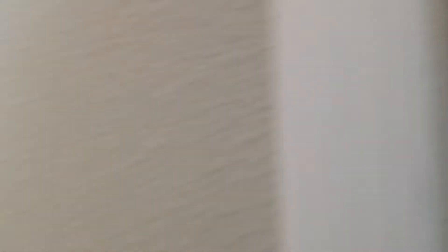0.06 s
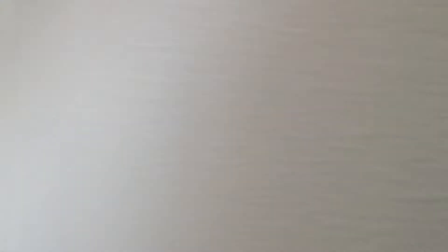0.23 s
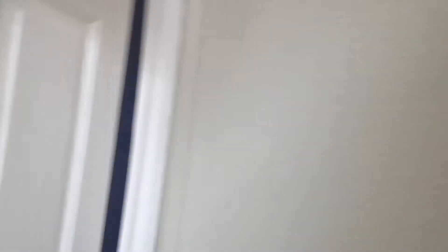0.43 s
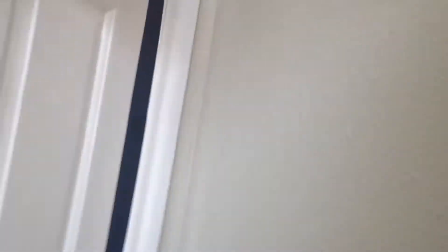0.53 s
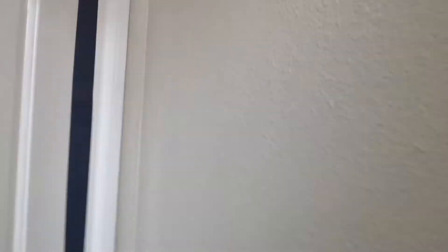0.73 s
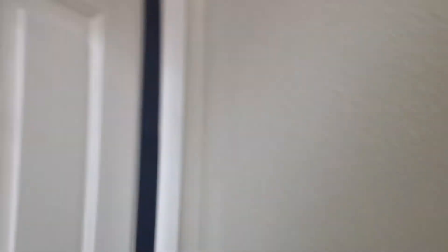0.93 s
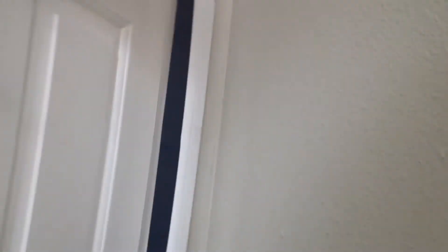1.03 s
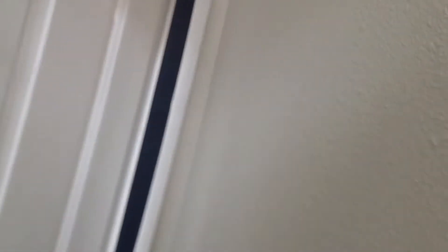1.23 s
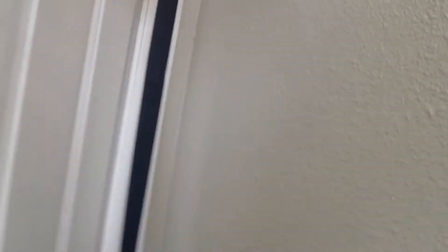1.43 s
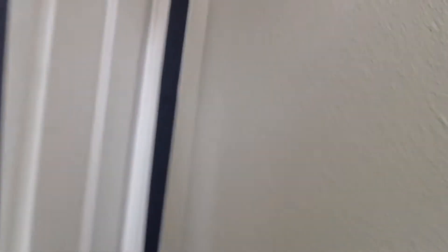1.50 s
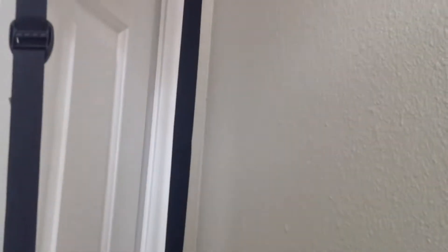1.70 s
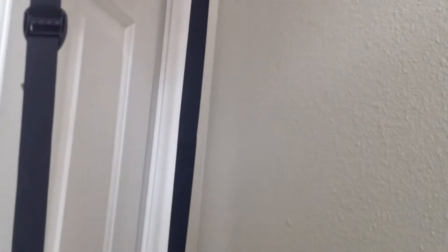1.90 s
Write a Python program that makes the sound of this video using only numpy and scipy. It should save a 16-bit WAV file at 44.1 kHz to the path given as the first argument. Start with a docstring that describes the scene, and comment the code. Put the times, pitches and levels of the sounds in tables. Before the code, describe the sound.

One sharp, metallic snap of a latch or switch rings briefly in a quiet little room. Fingers tick and rustle on the microphone, bump it with a dry knock about a second later, and two faint, distant clacks follow.

```python
"""Over quiet room air a hand rustles; then a stiff switch or latch slips and snaps with a hard click.
The impact sets a small metal part and its panel vibrating, the small bare room reverberates, and the
part rebounds with a bright chink. Faint ticks, finger taps and rustle follow. About a second after the
snap a dry knock excites the damped modes of the hand-held camera's body. Last come two soft clacks
further off, among more ticks and rustle."""
import sys
import numpy as np
from scipy import signal
from scipy.fft import rfft, irfft, next_fast_len
from scipy.io import wavfile

SR = 44100
rng = np.random.default_rng(int(sys.argv[2]) if len(sys.argv) > 2 else 0)


def materialize(psi):
    """Save the field psi as 16-bit PCM at rate SR to the path in sys.argv[1].

    A 1-D psi becomes a single channel; in a 2-D psi each row is a channel.
    """
    bounded = np.clip(np.atleast_2d(psi).T, -1, 1)
    quanta = np.round(bounded * 32767).astype(np.int16)
    wavfile.write(sys.argv[1], SR, quanta)


N = 85995

# Spectra of low room noise and of hiss. Each row: frequency in Hz, relative gain in dB.
AIR_LOW = [(20, -22), (50, -21.5), (80, -17.5), (120, -6), (270, -2), (480, -2.5), (850, -4.5),
           (3000, -10.5), (4000, -32)]
AIR_HISS = [(1760, -48), (3000, -4.5), (4430, -3), (6780, -0.5), (11000, -4.5), (15000, -4.5)]
# Drift of the air. Each row: time in seconds, low noise level in dB, hiss level in dB.
AIR_LEVELS = [(0, -72, -65.5), (.13, -67.5, -66), (.22, -62.5, -58.5), (.47, -61, -56.5),
              (.64, -64.5, -59.5), (.74, -61.5, -64.5), (.9, -69.5, -65), (1.05, -66, -63.5),
              (1.16, -65, -61.5), (1.3, -67, -62.5), (1.78, -67, -62), (1.95, -64.5, -64)]
# Hand rustles. Each row: peak time in seconds, level in dB, length in seconds, centre in Hz,
# half-width in octaves.
RUSTLES = [(0.208, -60, 0.074, 950, 0.37), (0.719, -63, 0.13, 3700, 0.89), (1.498, -61, 0.1, 3600, 0.64),
           (1.6, -59.5, 0.097, 3420, 0.37), (1.646, -59.5, 0.13, 6450, 0.63),
           (1.88, -61.5, 0.22, 1830, 1.5)]
# Contacts of the snap and of its rebound. Each row: start in seconds, level in dB.
SNAP_CONTACTS = [(.2314, -14), (0.23203, -14), (0.2337, -16.5)]
REBOUND_CONTACTS = [(.2609, -13), (.2641, -17)]
# Modes of the metal part, its long ping, its panel and its rebound.
# Each row: frequency in Hz, level in dB, T60 (time to fall by 60 dB) in seconds.
PART_MODES = [(1444, -28.5, 0.078), (3113, -33.5, 0.14), (4905, -33, 0.17), (5500, -34, 0.14),
              (6330, -26, 0.077), (6540, -37.5, .16), (8860, -27.5, .09)]
PING_MODE = [(5418, -30.5, .32)]
PANEL_MODES = [(112.8, -39, 0.23), (288.6, -37.5, .17), (336.5, -42, .28), (443, -37.5, 0.21),
               (696, -40, 0.26), (953, -33.5, 0.13), (1223, -40, 0.24)]
REBOUND_MODES = [(6072, -42, .16), (6330, -35, 0.17), (6820, -28, 0.15), (6870, -33, .13),
                 (7090, -36, 0.18), (7208, -33.5, 0.11)]
# Reverberation time of the room. Each row: frequency in Hz, T60 in seconds.
ROOM_T60 = [(100, 0.31), (400, 0.37), (1500, 0.23), (7000, 0.23), (15000, 0.28)]
# Ticks of the grip. Each row: start in seconds, level in dB, T60 in seconds, tilt in dB per octave.
TICKS = [(0.7631, -48.5, 0.016, -2.5), (0.9658, -48.5, 0.044, 0), (1.0007, -49, 0.017, -0.5),
         (1.012, -56, 0.073, 1), (1.186, -44, 0.0061, 15.5), (1.2667, -45, .008, 17),
         (1.3288, -52, .008, 7), (1.4065, -50, 0.015, 6), (1.412, -52.5, 0.029, 1), (1.8638, -51, .008, 7),
         (1.93, -49, 0.013, 3)]
# Finger taps on the camera. Each row: start in seconds, level in dB.
TAPS = [(0.9653, -46), (0.9696, -48)]
# Modes under a tap. Each row: frequency in Hz, level in dB relative to the tap, T60 in seconds.
GRIP_MODES = [(315, 0, 0.031), (910, -4, 0.015), (2083, -10, 0.044)]
# Modes of the camera body. Each row: frequency in Hz, level in dB, then T60, lag and rise in seconds.
BODY_MODES = [(196, -45.5, 0.098, 0.0011, 0.0024), (366, -13.5, 0.024, 0.0016, 0.0019),
              (586, -11, 0.011, 0.00056, 0.00092), (895, -14, 0.013, 0.00019, 0.0011),
              (1000, -15, .01, 0.00021, 0.00039), (1330, -27.5, 0.016, 0.00039, 0.0011),
              (1710, -25, 0.014, 0.00023, 0.00025), (2220, -20.5, 0.011, 0.00045, 0.00092)]
# Distant clacks. Each row: start in seconds, level in dB.
CLACKS = [(1.651, -45), (1.6935, -45)]
# Spectra of each source's noise. Each row: frequency in Hz, relative gain in dB.
SNAP_SPECTRUM = [(30, -62), (130, -27.5), (450, -11.5), (1000, -14), (1200, -25), (1430, -5), (2200, -10.5),
                 (2550, -14.5), (3150, 3), (3500, -5.5), (4300, -4.5), (4880, -3.5), (5200, -4), (5550, 3),
                 (5800, -4.5), (6250, 2.5), (6550, -4.5), (7150, 2), (7550, -8), (8800, -3), (10600, -9),
                 (11200, -24.5), (11900, -10), (15500, -16.5)]
ROOM_SPECTRUM = [(45, -39), (78, -9), (120, -2), (190, -9.5), (350, -4.5), (700, -11), (1400, -6),
                 (4200, -9), (5500, -2), (6800, 5), (7900, 0), (9000, -1), (11500, -10), (15000, -7.5)]
REBOUND_SPECTRUM = [(1000, -40), (5000, -40.5), (6200, -12), (6900, 5.5), (7300, -13.5), (7900, -23),
                    (11000, -34), (15500, -30.5)]
TICK_SPECTRUM = [(60, -60), (350, 0.5), (2000, 4.5), (4500, -3.5), (7000, -1.5), (15000, -13.5)]
KNOCK_SPECTRUM = [(50, -36), (200, 0.5), (1500, -9), (2800, -4.5), (4000, -3.5), (5300, 1.5), (6200, -2),
                  (7100, 5), (8000, -1.5), (10000, -7.5), (15500, -11)]
CLACK_SPECTRUM = [(50, -36), (150, 0.5), (1000, -6), (2100, 3.5), (3300, -0.5), (5000, -7), (6200, 5),
                  (8200, 3.5), (11000, -7.5), (15000, -8.5)]

SNAP_S, KNOCK_S, ROOM_RISE_S = SNAP_CONTACTS[0][0], 1.3597, 0.00315
FFT_SIZE = 2 * next_fast_len(N)
FREQS_HZ = np.fft.rfftfreq(FFT_SIZE, 1 / SR)


def amp(db):
    """Amplitude grows tenfold for every 20 dB."""
    return 10 ** (np.asarray(db) / 20)


def curve(points, hz=FREQS_HZ):
    """Interpolation between (Hz, value) points on a logarithmic frequency axis."""
    point_hz, values = np.transpose(points)
    return np.interp(np.log(hz + 1), np.log(point_hz + 1), values)


def colour(x, db):
    """A minimum-phase filter shapes the spectrum while conserving the power of white noise."""
    gain = np.maximum(amp(db), 1e-6)
    gain /= np.sqrt(np.mean(gain ** 2))
    cepstrum = irfft(np.log(gain))
    # folding the cepstrum onto positive time makes the filter causal
    cepstrum[1:FFT_SIZE // 2] *= 2
    cepstrum[FFT_SIZE // 2 + 1:] = 0
    return irfft(rfft(x, FFT_SIZE) * np.exp(rfft(cepstrum)), FFT_SIZE)[:N]


def low_cut(x, hz):
    """A second-order high-pass filter attenuates the bass below hz."""
    return signal.sosfilt(signal.butter(2, hz, 'highpass', fs=SR, output='sos'), x)


def since(start):
    """Seconds elapsed since start, zero before it."""
    return np.maximum(np.arange(N) / SR - start, 0)


def envelope(start, t60, rise):
    """Damping gives exponential decay after a quick rise; all times are in seconds."""
    t = since(start)
    return np.exp(-np.log(1000) * t / t60) * (1 - np.exp(-t / rise))


def burst(start, t60, rise=0.0001, crack=0):
    """Dense modes merge into decaying noise; crack adds the impulse of contact."""
    x = rng.standard_normal(N) * envelope(start, t60, rise)
    x[round(start * SR)] += 2 * crack
    return x


def ring(start, hz, t60, rise):
    """A freely vibrating mode is a damped sinusoid."""
    return np.sin(2 * np.pi * hz * since(start)) * envelope(start, t60, rise)


def air():
    """Ambient noise: a low band and a hiss, each drifting slowly in level."""
    times, low_db, hiss_db = np.transpose(AIR_LEVELS)
    return sum(amp(np.interp(since(0), times, db)) * colour(rng.standard_normal(N), curve(spectrum))
               for db, spectrum in [(low_db, AIR_LOW), (hiss_db, AIR_HISS)])


def rustles():
    """Friction of the moving hand makes bands of noise that swell and fade."""
    out = np.zeros(N)
    for peak, db, length, centre_hz, half_width in RUSTLES:
        swell = np.exp(-(2 * (since(0) - peak) / length) ** 2)
        octaves = np.log2((FREQS_HZ + 1) / centre_hz)
        band_db = -20 * np.log10(1 + (octaves / half_width) ** 2)
        out += amp(db) * swell * colour(rng.standard_normal(N), band_db)
    return out


def snap():
    """Impact excitation: after a brief slip, three quick contacts ring the part and its panel."""
    slip = amp(-38) * burst(SNAP_S - 0.0077, t60=0.14, rise=0.0061)
    blows = sum(amp(db) * burst(start, t60=0.022, crack=3.16) for start, db in SNAP_CONTACTS)
    modes = sum(amp(db) * ring(SNAP_S + rng.uniform(0, 0.00102), hz, t60, rise=0.0017)
                for hz, db, t60 in PART_MODES + PING_MODE + PANEL_MODES)
    return colour(slip + blows, curve(SNAP_SPECTRUM)) + modes


def reverberation():
    """The snap's diffuse field decays at its own rate in each band; wall reflections cluster later."""
    hz, t, bands = signal.stft(rng.standard_normal(N), SR, nperseg=256)
    decay = np.exp(-np.log(1000) * np.maximum(t - SNAP_S, 0) / curve(ROOM_T60, hz)[:, None])
    build_up = 1 - np.exp(-since(SNAP_S) / ROOM_RISE_S)
    tail = signal.istft(bands * decay, SR, nperseg=256)[1][:N] * build_up
    walls = burst(SNAP_S + 0.0224, t60=0.11, rise=0.0072)
    return colour(amp(-23.5) * tail + amp(-17) * walls, curve(ROOM_SPECTRUM))


def rebound():
    """Two rebound impacts excite closely spaced high modes: a bright metallic chink and its echo."""
    first = REBOUND_CONTACTS[0][0]
    blows = sum(amp(db) * burst(start, t60=0.012, rise=0.0006) for start, db in REBOUND_CONTACTS)
    chinks = sum(amp(db + 18) * ring(start, hz=6930, t60=0.005, rise=0.0015)
                 for start, db in REBOUND_CONTACTS)
    echo = amp(-35.5) * burst(first, t60=0.27, rise=ROOM_RISE_S)
    modes = sum(amp(db) * ring(first + rng.uniform(0, 0.00095), hz, t60, rise=0.001)
                for hz, db, t60 in REBOUND_MODES)
    return colour(blows + echo, curve(REBOUND_SPECTRUM)) + chinks + modes


def ticks():
    """Tiny contacts of the grip give broadband transients, each with its own spectral tilt."""
    octaves = np.log2(np.maximum(FREQS_HZ, 200) / 1000)
    return sum(amp(db) * colour(burst(start, t60, crack=2.5), curve(TICK_SPECTRUM) + tilt * octaves)
               for start, db, t60, tilt in TICKS)


def taps():
    """Soft finger taps excite the hollow resonances of the camera."""
    modes = sum(amp(tap_db + mode_db) * ring(start, hz, t60, rise=0.00046)
                for start, tap_db in TAPS for hz, mode_db, t60 in GRIP_MODES)
    return low_cut(modes, hz=190)


def knock():
    """The struck camera body's high modes are damped sooner than its lowest, so the pitch seems to drop."""
    body = sum(amp(db) * ring(KNOCK_S + lag, hz, t60, rise) for hz, db, t60, lag, rise in BODY_MODES)
    antiresonance = signal.iirnotch(729, Q=5.4, fs=SR)
    body = signal.lfilter(*antiresonance, low_cut(body, hz=270))
    touch = amp(-38) * burst(KNOCK_S - 0.0012, t60=0.02, rise=0.00025)
    crack = amp(-26.5) * burst(KNOCK_S + 0.0007, t60=0.01, crack=4.6)
    near_wall = amp(-31.5) * burst(KNOCK_S + 0.0039, t60=0.024)
    echo = amp(-46) * burst(KNOCK_S, t60=0.2, rise=0.0019)
    room_mode = amp(-54.5) * ring(KNOCK_S, hz=105, t60=0.15, rise=0.0099)
    return body + room_mode + colour(touch + crack + near_wall + echo, curve(KNOCK_SPECTRUM))


def clacks():
    """Two distant impacts are heard as softly rising, exponentially decaying noise."""
    blows = sum(amp(db) * burst(start, t60=0.083, rise=0.0012) for start, db in CLACKS)
    return colour(blows, curve(CLACK_SPECTRUM))


def scene():
    """Superposition: the pressures of all sources add at one microphone."""
    latch = snap() + reverberation() + rebound()
    return (air() + rustles() + latch + ticks() + taps() + knock() + clacks())[None]


def record(dry):
    """Band limiting: the camera acts as a steep low-pass filter."""
    cutoff_hz = 15330
    attenuation = 1 + (FREQS_HZ / cutoff_hz) ** 400
    return irfft(rfft(dry, FFT_SIZE) / attenuation, FFT_SIZE)[:, :N]


dry = scene()
out = record(dry)
materialize(out)
```